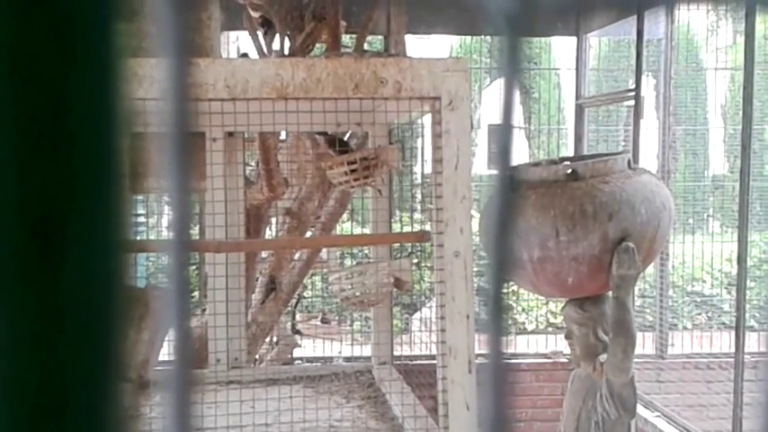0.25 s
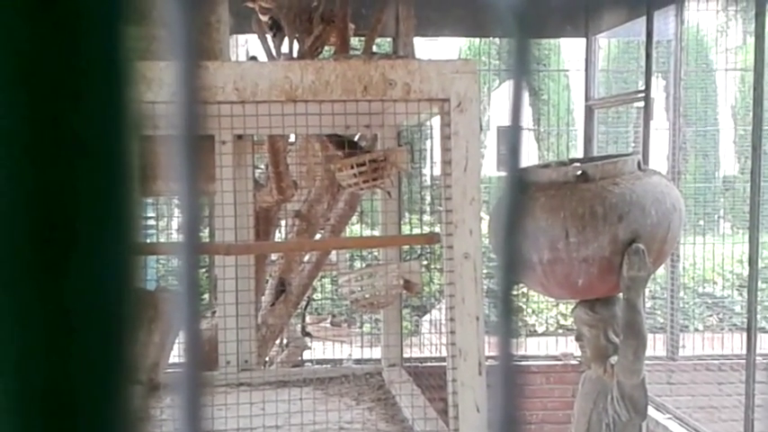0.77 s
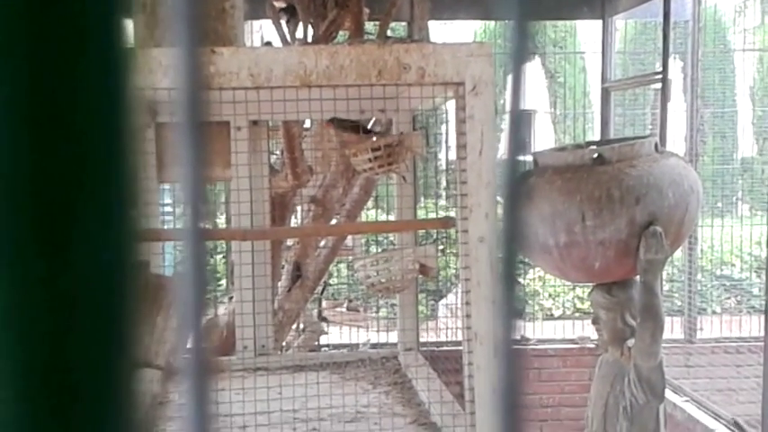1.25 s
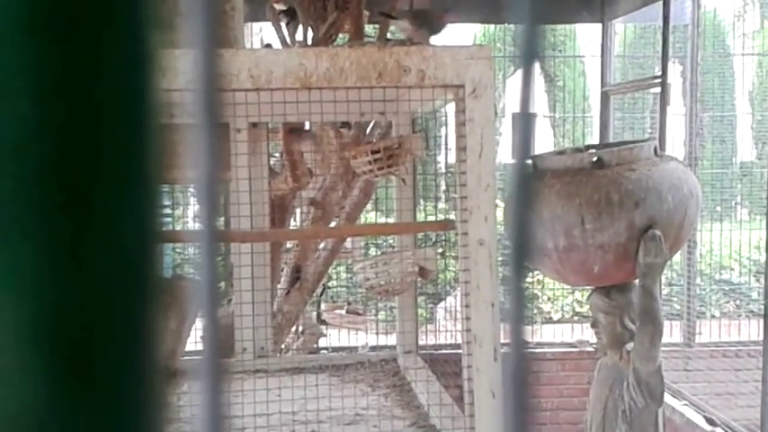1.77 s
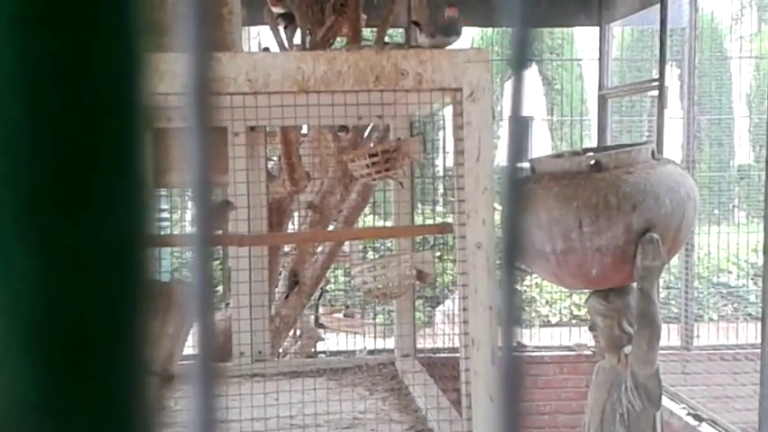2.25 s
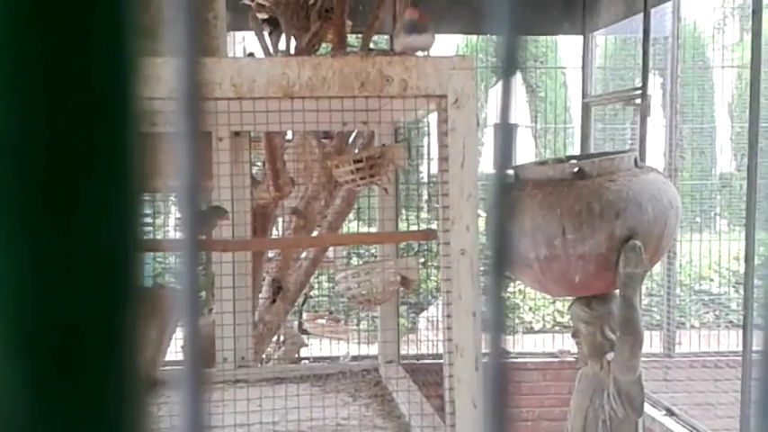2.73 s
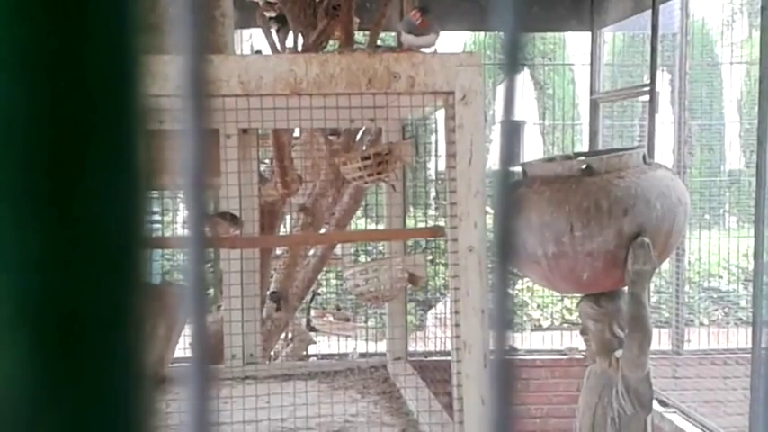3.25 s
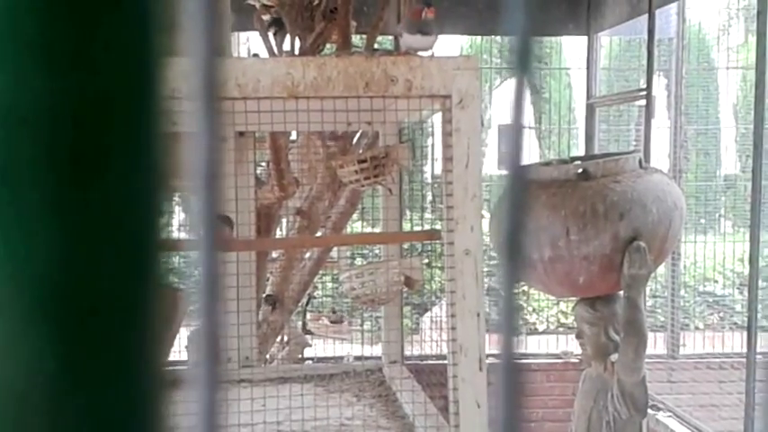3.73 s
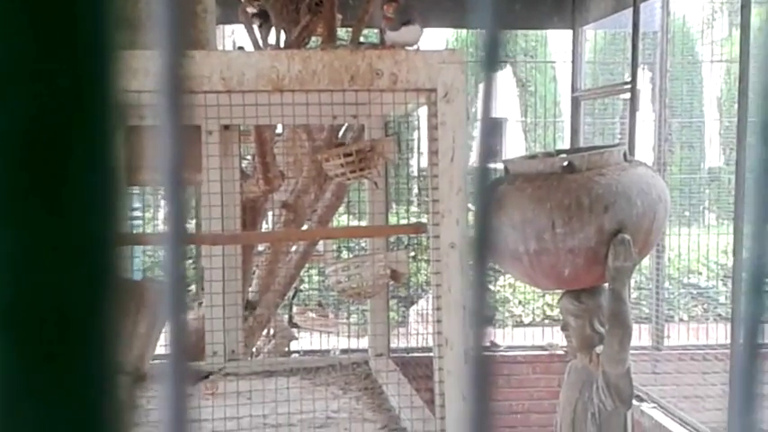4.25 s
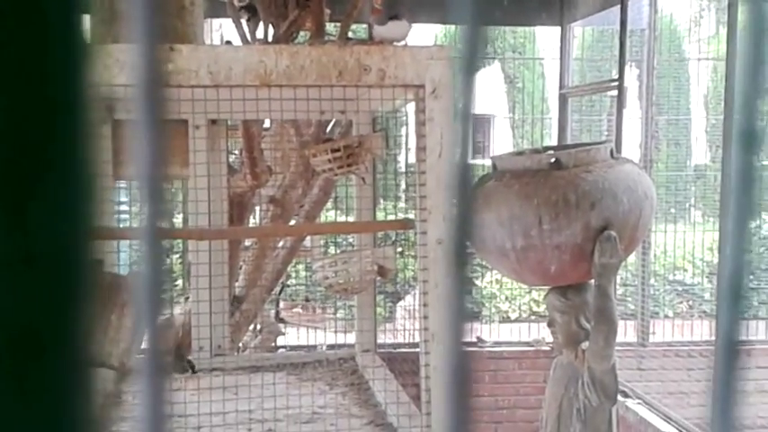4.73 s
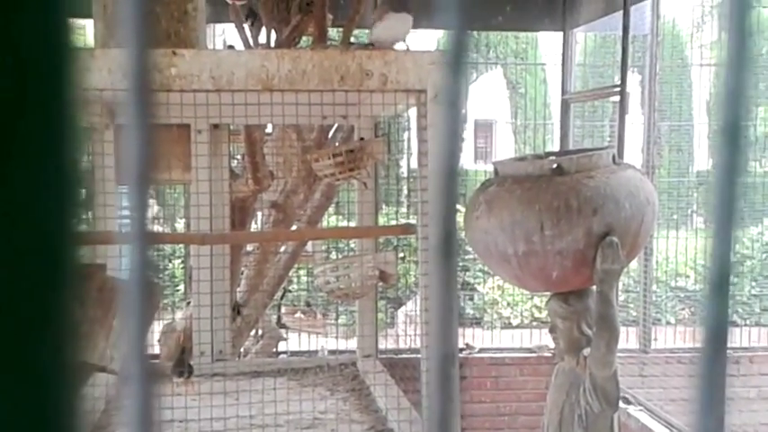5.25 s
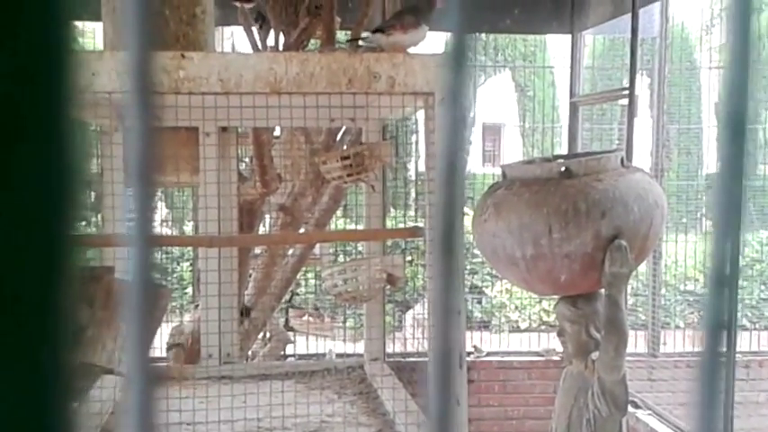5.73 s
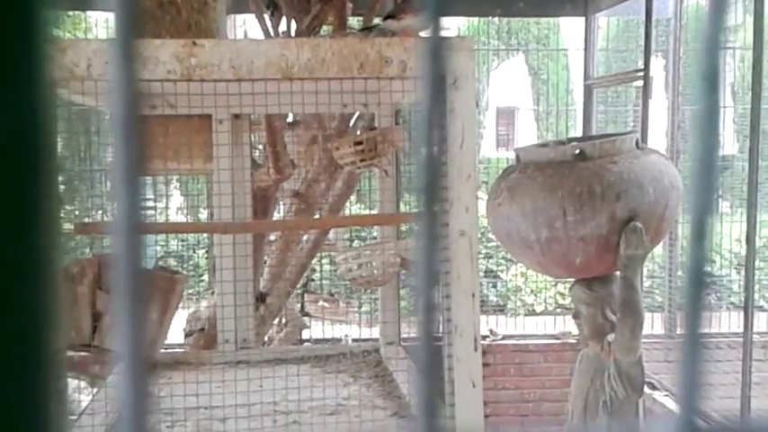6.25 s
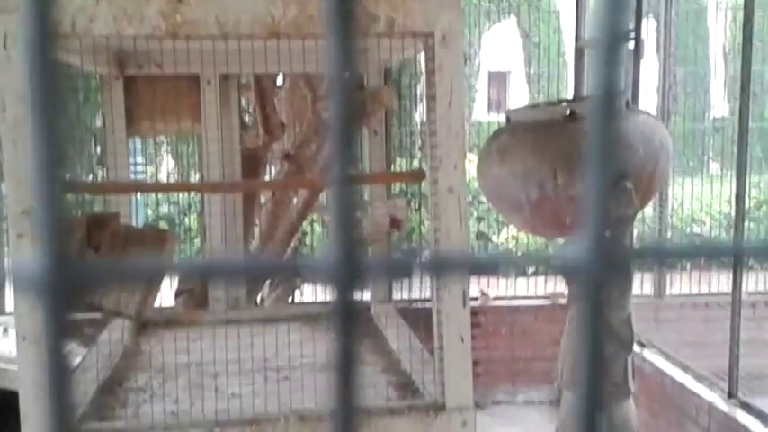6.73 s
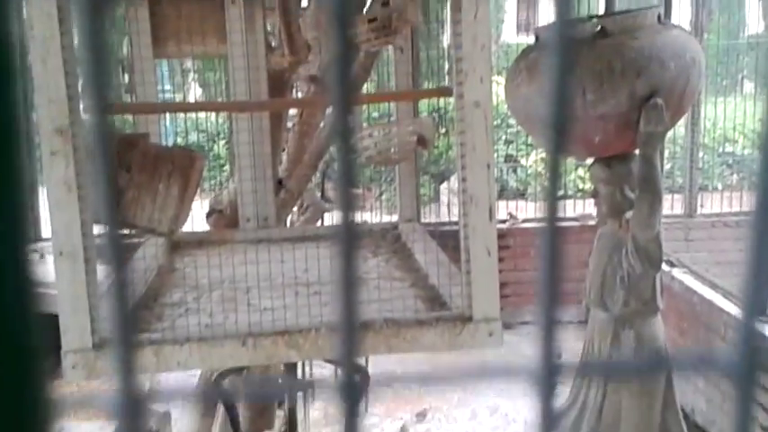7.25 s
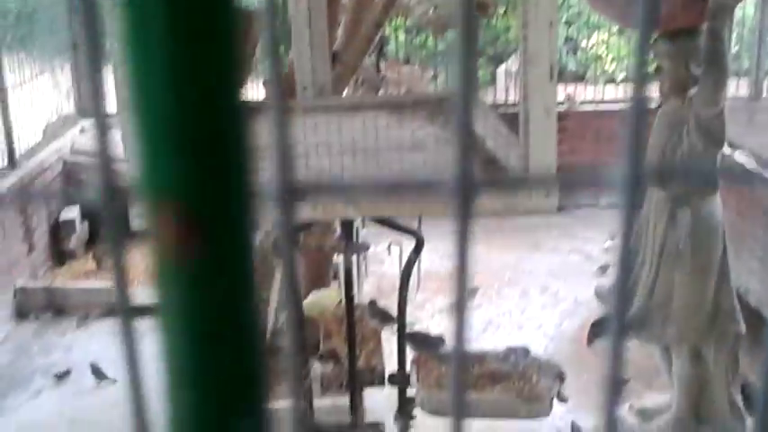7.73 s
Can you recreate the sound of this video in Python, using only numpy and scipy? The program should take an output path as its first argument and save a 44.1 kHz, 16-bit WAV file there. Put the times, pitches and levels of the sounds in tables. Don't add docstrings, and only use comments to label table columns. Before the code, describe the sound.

Bright finch whistles, quick chips and harsh scolds burst over a continuous blurred chorus of distant birds, with wing flutters and dry wire ticks.

```python
import sys
import numpy as np
from scipy import signal
from scipy.io import wavfile
from scipy.ndimage import uniform_filter1d

SR = 44100
rng = np.random.default_rng(int(sys.argv[2]) if len(sys.argv) > 2 else 0)


def output_pcm(signal):
    pcm = np.clip(np.atleast_2d(signal).T, -1, 1) * 32767
    wavfile.write(sys.argv[1], SR, np.round(pcm).astype(np.int16))


def voltage_ratio(decibels):
    exponent = np.asarray(decibels, float) / 20
    return 10 ** exponent


N = 352403


def evened(x):
    return x / np.sqrt(np.mean(x ** 2) + 1e-20)


def read(points, hz):
    f, value = np.transpose(points)
    return np.interp(np.log(hz + 1), np.log(f + 1), value)


def add(mix, start_s, sound):
    part = mix[max(round(start_s * SR), 0):][:len(sound)]
    part += sound[:len(part)]


def wobble(seconds):
    size = max(int(seconds * SR), 2)
    noise = uniform_filter1d(rng.standard_normal(N), size)
    return evened(uniform_filter1d(noise, size))


def hiss(colour, patchy_db, lift_db=0):
    frames, hz = N // 256 + 5, np.fft.rfftfreq(1024, 1 / SR)
    real, imag, patches = rng.standard_normal((frames, 513, 3)).T
    patches = uniform_filter1d(patches, size=8, axis=0)
    patches = evened(uniform_filter1d(patches, size=12, axis=1))
    level_db = read(colour, hz)[:, None] + patchy_db * patches + lift_db
    spectra = (real + 1j * imag) * voltage_ratio(level_db)
    return evened(signal.istft(spectra, nperseg=1024, noverlap=768)[1][:N])


def held(rows, scoop=0.0246, droop=0.023):
    return [(s, length, hz * (1 - scoop), hz, hz * (1 - droop), db) for s, length, hz, db in rows]


def glided(rows, bend=.62):
    return [(s, length, a, a + bend * (b - a), b, db) for s, length, a, b, db in rows]


def sing(rows, jitter_hz, flutter_db, octave_db, fade, attack_s):
    out = np.zeros(N)
    shake = wobble(.0012) + .3 * wobble(.008)
    flutter = wobble(.0016) + .5 * wobble(.008)
    for s, length, start_hz, mid_hz, end_hz, db in rows:
        at = min(max(round(s * SR), 0), N - 2)
        u = np.linspace(0, 1, max(int(length * SR), 8))[:N - at]
        span = slice(at, at + len(u))
        arch_hz = np.polyval(np.polyfit([0, .5, 1], [start_hz, mid_hz, end_hz], 2), u)
        strain = 1 + .25 * (length > .105 and db < -21)
        phase = 2 * np.pi * np.cumsum(arch_hz + strain * jitter_hz * shake[span]) / SR
        effort = voltage_ratio(octave_db + 0.62 * min(db + 10, 0) - 13.4 * u) * (0.46 + shake[span])
        overtone = np.sin(2 * phase) + voltage_ratio(-7) * np.sin(3 * phase)
        tone = np.sqrt(2) * (np.sin(phase) + effort * overtone)
        shape = np.clip(np.minimum(u * length / attack_s, (1 - u) / fade), 0, 1)
        shape = shape * voltage_ratio(np.sqrt(strain) * flutter_db * flutter[span])
        add(out, s, voltage_ratio(db) * shape * tone)
    return out


def aviary(x, longer=1):
    # frequency in Hz, t60 in s.
    decay = [(1000, .35), (3000, .3), (6000, .3), (10000, .22)]
    out, place = np.zeros(N), 2 * np.pi * 3.1 * np.arange(N) / SR
    for k in range(3):
        taps = np.zeros(SR // 2)
        at = np.arange(90, SR // 2 - 20, 20) + rng.integers(0, 20, (SR // 2 - 91) // 20)
        taps[at] = rng.choice([-1., 1.], len(at))
        hz, t, z = signal.stft(taps, SR, nperseg=256)
        t60_s = longer * read(decay, hz)[:, None]
        tail = signal.istft(z * voltage_ratio(-60 * t / t60_s), SR, nperseg=256)[1]
        share = np.sqrt(2 / 3) * np.cos(place + k * np.pi / 3)
        out += signal.oaconvolve(x * share, tail / np.linalg.norm(tail))[:N]
    return out


def traffic():
    # frequency in Hz, level in dB per Hz.
    wash_colour = [(12, -38.5), (20, -13), (27, -17), (96, 6.5), (146, -2.5), (225, -7), (341, -2.5),
                   (555, -9), (630, -6), (841, -9.5), (1500, -7.5), (1950, -15), (3300, -120)]
    # time in s, level in dB.
    rumble = [(0.0, -54.5), (3.71, -53), (4.74, -54.5), (5.83, -50.5), (7.99, -52)]
    # time in s, level in dB.
    hum = [(0.0, -57), (4.87, -50), (5.5, -40), (5.87, -60), (7.99, -50.5)]
    t, hz = np.arange(N) / SR, np.fft.rfftfreq(1024, 1 / SR)[:, None]
    s, level_db = np.transpose(rumble)
    swell_db = np.interp(np.arange(N // 256 + 5) * 256 / SR, s, level_db - level_db.mean())
    wash = hiss(wash_colour, 1.9, swell_db * np.clip((200 - hz) / 80, 0, 1))
    drone = np.sin(2 * np.pi * np.cumsum(145 * (1 + 0.0146 * wobble(0.221))) / SR)
    drone_db = np.interp(t, *np.transpose(hum)) - 7.0
    return voltage_ratio(-47.5) * wash + voltage_ratio(drone_db) * drone


def chorus():
    # time in s, level in dB, low voices against the rest in dB.
    flock = [(0, -29.5, -11.5), (.5, -34.5, -11), (.89, -31, -12), (1.11, -37.5, -11.5), (1.27, -29, -11.5),
             (1.42, -36.5, -14), (2.07, -35, -8.5), (2.4, -29.5, -13), (2.7, -32, -9.5),
             (3.1, -34.5, -12.5), (4.62, -28.5, -10.5), (4.76, -32, -9), (5.96, -28.5, -13.5),
             (6.36, -34.5, -5.5), (6.72, -29, -12), (7.1, -35, -9), (7.36, -27, -15.5), (7.55, -32, -9)]
    # frequency in Hz, level in dB per Hz.
    colour = [(530, -27.5), (900, -16.5), (2330, -8), (2620, -10), (3720, -2), (4990, -3), (5810, -0.5),
              (7010, -12.5), (7610, -18.5), (8070, -25), (9740, -26), (13800, -33.5), (14900, -31)]
    s, level_db, low_db = np.transpose(flock)
    when, long, high, bend, loud = rng.random((650, 5)).T
    hz = 2500 + 4200 * high ** .7
    start_hz, end_hz = hz * (1 - 0.1485 * bend), hz * (1 + 0.083 * bend)
    call_db = read(colour, hz) - 5 * loud
    rows = np.transpose([when * N / SR, 0.0157 + 0.0436 * long, start_hz, hz, end_hz, call_db])
    calls = sing(rows, 77.3, 0.47, -47, 0.43, 0.012)
    calls = evened(voltage_ratio(-20.0) * calls + aviary(calls, 0.8))

    t = np.arange(N // 256 + 5) * 256 / SR - 512 / SR
    hz = np.fft.rfftfreq(1024, 1 / SR)[:, None]
    shrill = np.clip((hz - 2900) / 600, 0, 1)
    swell_db = np.interp(t, s, level_db) - np.mean(level_db)
    lows_db = np.interp(t, s, level_db + low_db) - np.mean(level_db + low_db)
    lift_db = shrill * swell_db + 0.55 * (1 - shrill) * lows_db
    lift_db = lift_db * np.clip((8200 - hz) / 1500, .3, 1)
    shrill_bunches = np.resize(wobble(.03)[::256], len(t))
    low_bunches = np.resize(wobble(.05)[::256], len(t))
    bunches_db = 2.15 * shrill * shrill_bunches + 1.15 * (1 - shrill) * low_bunches
    lift_db = lift_db + bunches_db * (hz < 7500)
    patchy_db = 2.27 * np.where(hz < 7300, 1, .5)
    blur = hiss(colour, patchy_db, lift_db) * voltage_ratio(np.mean(level_db) + 2.0)
    calls_db = np.interp(np.arange(N) / SR, s, level_db) - 4.5
    return voltage_ratio(-2.5) * blur + voltage_ratio(calls_db) * calls


def ticks():
    # start in s, peak level in dB, ring frequency in Hz.
    strikes = [
        (1.1836, -17.5, 7430),
        (4.7426, -19, 6760),
        (2.2542, -34, 5700),
        (2.5155, -31, 5600),
        (2.6105, -28, 4500),
        (2.632, -35, 4500),
        (7.633, -39, 6800),
        (7.9727, -33, 6800),
    ]
    out, t = np.zeros(N), np.arange(300) / SR
    for s, db, hz in strikes:
        ring = np.sin(2 * np.pi * hz * t) * voltage_ratio(-60 * t / .006)
        crack = np.diff(rng.standard_normal(300), prepend=0) * voltage_ratio(-15 - 60 * t / .004)
        add(out, s, voltage_ratio(db + 10.5) * (ring + crack))
    return out


def wings_and_scolds():
    # start in s, length in s, low edge in Hz, level in dB.
    flurries = [(0.182, .13, 3130, -31.5), (0.738, .099, 3020, -36.5), (1.2, 0.13, 2700, -29),
                (1.584, 0.014, 1570, -33.5), (2.556, 0.14, 3020, -36), (3.53, 0.13, 4440, -34),
                (4.437, 0.061, 3500, -28), (5.172, 0.05, 5400, -25), (7.227, 0.14, 1990, -33),
                (7.317, 0.21, 3020, -37)]
    # start in s, length in s, low edge in Hz, level in dB.
    scolds = [(0.811, 0.053, 4270, -28), (1.072, 0.16, 5220, -14), (1.352, 0.095, 4730, -23.5),
              (3.426, 0.085, 4700, -25), (4.215, .088, 3380, -37), (6.65, 0.14, 3200, -35),
              (.823, 0.16, 4730, -28), (7.228, .1, 4700, -25.5), (5.185, .13, 4500, -27),
              (4.835, .07, 5000, -28)]
    out, air = np.zeros(N), rng.standard_normal(N) * voltage_ratio(2.2 * wobble(.003))
    rows = [(*row, 6900, -18.5) for row in flurries]
    rows += [(*row, 6140, -30) for row in scolds]
    for s, length, low_hz, db, high_hz, air_db in rows:
        piece = air[round(s * SR):][:int(length * SR)]
        band = signal.butter(3, [low_hz, high_hz], "band", fs=SR, output="sos")
        body = evened(signal.sosfilt(band, piece))
        u = np.linspace(0, 1, len(piece))
        shape = np.minimum(u / 0.061, 1) * np.cos(u * np.pi / 2) ** 1.65
        add(out, s, voltage_ratio(db) * (body + voltage_ratio(air_db) * piece) * shape)
    return out


def far_peeps():
    # start in s, length in s, pitch in Hz, level in dB.
    peeps = [(.082, 0.059, 4000, -32.5), (.425, .05, 2880, -35), (.166, 0.045, 6800, -34),
             (.75, .06, 4150, -36), (.67, 0.058, 3774, -34.5), (.8, 0.065, 3720, -36),
             (.885, .035, 4020, -32), (.935, 0.018, 4060, -33), (.965, .02, 4050, -34),
             (2.322, .025, 5850, -33), (1.209, 0.075, 3060, -38), (1.615, 0.045, 4190, -36),
             (1.82, 0.094, 3590, -39), (2.136, 0.13, 2870, -36), (2.59, 0.11, 5130, -33.5),
             (2.717, 0.056, 4670, -31.5), (2.48, .095, 4660, -29.5), (2.325, .05, 4780, -31),
             (2.238, .018, 5000, -32), (2.205, .06, 3950, -34), (3.97, .05, 3800, -36),
             (4.25, .03, 5720, -31), (7.515, .02, 5550, -30), (3.57, .035, 4850, -34),
             (2.78, 0.047, 3600, -34), (2.853, 0.042, 5500, -32), (2.942, .031, 4520, -38),
             (3.75, 0.029, 5400, -40), (4.06, 0.055, 2815, -40), (4.745, 0.073, 2800, -35),
             (4.76, .045, 4880, -35), (6.125, 0.092, 5150, -31.5), (4.962, .018, 5680, -27),
             (4.992, .015, 5850, -28), (5.01, .015, 5650, -30), (4.645, 0.016, 5670, -26),
             (6.05, 0.094, 3750, -36), (6.383, 0.051, 4666, -31.5), (6.59, 0.04, 5480, -34),
             (6.84, 0.028, 6120, -33), (6.505, 0.043, 3430, -40), (7.345, 0.028, 3970, -38),
             (7.68, 0.075, 3700, -33.5), (7.835, .06, 3430, -36), (7.415, .025, 3080, -36),
             (.02, .05, 4280, -33), (7.882, 0.14, 5930, -39)]
    return sing(held(peeps), 36, 3, -40, .4, .012)


def nasal_calls():
    # start in s, length in s, fundamental in Hz, level in dB.
    nasals = [(.01, 0.085, 1427, -33), (0.609, 0.074, 958, -30.5), (0.806, 0.1, 1360, -35),
              (2.069, 0.1, 642, -46), (2.303, 0.1, 958, -39), (2.481, 0.1, 1165, -41),
              (2.708, 0.093, 937, -37), (3.374, 0.06, 1014, -32), (3.765, 0.09, 1365, -32),
              (4.716, 0.09, 1390, -31), (5.335, 0.14, 1395, -39.5), (5.75, 0.06, 930, -38),
              (6.578, 0.085, 1400, -32), (6.734, 0.094, 1380, -44)]
    # frequency in Hz, gain in dB.
    throat = [(900, -30), (1400, -15), (1900, -23), (2800, -13), (3900, 3), (5000, -1), (5700, -11),
              (7000, -21)]
    overtones = [(s, length, k * hz, db + read(throat, k * hz))
                 for s, length, hz, db in nasals for k in range(1, 10) if k * hz < 7300]
    return sing(held(overtones, scoop=0.025, droop=0.012), 12, 2, -40, .22, .012)


def grainy_chatter():
    # start in s, length in s, from Hz, to Hz, level in dB.
    chatter = [(.198, .018, 4100, 4300, -26), (.228, .022, 4020, 4140, -28), (.2, 0.063, 4850, 4740, -29.5),
               (.19, 0.044, 3330, 3380, -32), (.675, .03, 5600, 5660, -32), (.67, 0.028, 4500, 4300, -35),
               (.92, 0.051, 5300, 5800, -32), (1.67, .04, 3300, 3480, -34.5), (1.675, .02, 6000, 6050, -35),
               (2.258, 0.028, 4080, 4280, -32), (2.395, 0.056, 5600, 5450, -31),
               (2.53, .05, 5600, 5900, -30), (2.575, 0.075, 3420, 3620, -28),
               (2.6, 0.044, 4150, 4010, -31.5), (3.43, .06, 4600, 4900, -31), (3.5, 0.095, 5900, 5680, -30),
               (3.53, 0.064, 5200, 5300, -31.5), (3.535, .03, 6800, 6850, -37),
               (4.03, 0.08, 4550, 4700, -34.5), (3.9, .07, 4600, 4450, -35), (5.1, .07, 6000, 5700, -33),
               (4.06, .07, 3700, 3450, -36), (4.18, .05, 5500, 5900, -29), (.44, .08, 4200, 3500, -35),
               (5.06, .06, 4900, 4100, -33), (4.78, .05, 3700, 4300, -33), (4.19, 0.065, 4270, 4025, -31),
               (4.215, 0.095, 3800, 3450, -31.5), (4.52, 0.094, 3510, 3720, -33.5),
               (4.63, 0.042, 4900, 4700, -39), (6.39, .04, 3880, 3500, -34),
               (6.645, 0.034, 4610, 3600, -28.5), (6.685, 0.037, 4400, 3590, -29.5),
               (6.735, .05, 4100, 3400, -31), (6.665, .035, 5300, 5770, -33), (6.77, .04, 4030, 4090, -37),
               (6.84, .05, 4690, 4520, -33.5), (7.245, 0.053, 6580, 6900, -35),
               (7.245, .045, 6100, 5900, -29), (7.39, 0.05, 5870, 5680, -37)]
    return sing(glided(chatter), 150, 4.5, -30, .4, .006)


def coos():
    # start in s, length in s, pitch in Hz, level in dB.
    mellow = [(0.41, 0.09, 1620, -47), (1.875, 0.08, 2155, -46), (1.96, 0.1, 2170, -44),
              (2.07, .1, 2250, -46), (3.554, .03, 1710, -42), (2.224, 0.14, 2138, -36.5),
              (2.46, 0.069, 2143, -39.5), (2.55, 0.073, 2012, -38.5), (2.62, 0.12, 2336, -39),
              (2.719, 0.098, 2240, -39), (4.3, 0.13, 1310, -52), (5.68, 0.04, 1600, -41),
              (6.274, 0.24, 2410, -47), (6.2, .1, 1310, -52), (7.04, 0.14, 1315, -49),
              (7.25, .1, 1300, -52), (7.493, 0.1, 1350, -51), (7.63, .1, 1240, -49),
              (7.235, .03, 2200, -41), (7.903, 0.092, 2110, -48.5)]
    return sing(held(mellow), 26, 2.8, -27, .5, .015)


def open_beak_calls():
    # start in s, length in s, from Hz, to Hz, level in dB.
    bright = [(4.432, .025, 5950, 6900, -25.5), (5.183, 0.103, 5130, 5090, -21),
              (7.315, .055, 3800, 4600, -23.5), (1.244, .046, 5050, 5250, -23.5),
              (1.345, 0.059, 5150, 5250, -25), (1.225, .07, 4400, 4550, -29), (1.07, .05, 5000, 5900, -24),
              (1.36, .075, 6650, 6720, -30.5), (1.222, .09, 6390, 7150, -29.5),
              (7.372, .035, 4400, 4500, -24), (7.415, .03, 4500, 4900, -24.5),
              (4.482, .02, 5960, 6650, -17.5)]
    return sing(glided(bright), 80, 2.8, -15, .4, .005)


def slurs():
    # start in s, length in s, from Hz, to Hz, level in dB.
    slides = [(0.91, .027, 4330, 7200, -28), (.815, .012, 4300, 6300, -28), (.825, .04, 4400, 5300, -29),
              (1.39, 0.059, 5400, 5600, -26.5), (.39, .05, 3900, 4280, -35), (.74, .04, 3550, 4300, -36),
              (3.278, .018, 5300, 4400, -32), (3.29, .03, 4700, 4550, -35), (3.37, .06, 4700, 5150, -39),
              (1.04, 0.082, 4840, 6020, -28), (7.275, .045, 3450, 3720, -31),
              (2.194, 0.16, 3730, 4110, -42), (4.172, .035, 7000, 6500, -31),
              (3.283, 0.016, 4800, 3700, -32), (4.177, 0.02, 5350, 5300, -26),
              (4.825, 0.03, 5200, 5900, -29), (5.416, .052, 5750, 5220, -35), (5.2, 0.013, 4650, 4800, -26),
              (5.838, .014, 4650, 4850, -26), (5.85, 0.018, 5100, 4750, -24), (5.76, .045, 5500, 6050, -34),
              (5.76, .045, 4150, 4530, -36), (6.025, .015, 5400, 5000, -34), (5.835, .025, 3700, 3150, -34),
              (5.45, .02, 4200, 4250, -32), (6.62, 0.028, 4500, 5000, -26.5), (6, .05, 3964, 4900, -43),
              (7.105, 0.015, 5650, 5900, -27), (5.695, 0.045, 4800, 5160, -28.5),
              (4.41, 0.027, 4500, 3900, -34.5), (7.428, .022, 4900, 4300, -23),
              (7.703, .018, 4550, 4850, -28), (7.72, 0.018, 4850, 4480, -26), (7.75, .035, 5500, 4700, -34)]
    return sing(glided(slides), 45, 2.2, -27, .3, .006)


def rising_chips():
    # start in s, length in s, top pitch in Hz, level in dB.
    chips = [(0.546, 0.027, 6450, -27.5), (1.067, 0.018, 6400, -24), (1.246, .036, 6900, -25),
             (1.368, 0.028, 6600, -28.5), (1.932, 0.016, 6730, -35), (2.244, 0.02, 6490, -30.5),
             (3.08, .031, 6350, -29.5), (3.741, 0.032, 6440, -26), (4.123, 0.024, 6200, -27.5),
             (4.839, 0.029, 6780, -24), (5.637, .033, 6640, -23.5), (6.056, 0.026, 6000, -27.5),
             (6.499, 0.026, 6600, -23), (6.908, 0.024, 6300, -24), (7.367, 0.025, 6380, -24)]
    rows = [(s, length, 4850, top_hz, db) for s, length, top_hz, db in chips]
    calls = sing(glided(rows, bend=.5), 70, 2.5, -42, .2, .005)
    return calls + voltage_ratio(-5.5) * aviary(calls, 0.32)


def near_whistles():
    # start in s, length in s, pitch in Hz, level in dB.
    whistles = [(.078, 0.078, 5080, -30), (.083, .018, 5760, -25.5), (.11, .04, 6050, -32),
                (.175, .02, 5270, -25), (.153, 0.038, 6040, -19), (.22, .034, 6240, -27.5),
                (.822, 0.16, 6498, -15.5), (1.105, 0.08, 6450, -21), (1.095, 0.11, 6050, -14),
                (1.104, 0.081, 5680, -16.5), (1.213, 0.044, 5800, -22), (2.512, 0.02, 5700, -27.5),
                (3.063, 0.052, 5000, -30.5), (3.437, 0.022, 5950, -17.5), (3.427, 0.017, 5550, -20),
                (3.478, 0.024, 5920, -21), (4.165, .014, 6300, -25), (4.184, 0.06, 6180, -20.5),
                (4.464, 0.026, 6350, -15.5), (4.497, 0.075, 6230, -17.5), (4.86, 0.03, 5700, -27),
                (5.04, 0.035, 5140, -25), (5.24, 0.047, 4990, -33), (5.96, 0.022, 4100, -29),
                (6.052, 0.073, 5460, -31), (6.225, 0.018, 4210, -27.5), (6.44, 0.014, 5640, -28),
                (7.01, 0.018, 4330, -28.5), (7.25, 0.055, 5620, -27), (6.44, .018, 6400, -31),
                (7.24, 0.033, 4300, -24)]
    return sing(held(whistles, scoop=0.0046, droop=0.0048), 75, 2.8, -27, .5, .005)


def scene():
    wire, harsh = ticks(), wings_and_scolds()
    far = far_peeps() + nasal_calls() + grainy_chatter()
    quick = rising_chips() + slurs()
    near = near_whistles() + coos() + open_beak_calls()
    to_walls = voltage_ratio(-3.0) * near + voltage_ratio(-4.5) * far + voltage_ratio(-1.5) * quick + voltage_ratio(-3.0) * harsh + voltage_ratio(-20) * wire
    direct = voltage_ratio(-1.0) * near + voltage_ratio(-3.0) * far + voltage_ratio(2.5) * quick + harsh + wire
    return (direct + aviary(to_walls) + chorus() + traffic())[None]


def top_cut(x):
    return signal.sosfilt(signal.butter(12, 15010, fs=SR, output="sos"), x)


def record(dry):
    power_db = 10 * np.log10(abs(uniform_filter1d(dry[0] ** 2, size=1500)) + 1e-12)
    fall_db = np.arange(N) * 23.0 / SR
    held_db = np.maximum.accumulate(power_db + fall_db) - fall_db
    over_db = np.maximum(held_db + 14.5, 0)
    mix = dry[0] / voltage_ratio(uniform_filter1d(over_db, size=300))
    mix = signal.sosfilt(signal.butter(2, 45, "high", fs=SR, output="sos"), mix)
    mix = mix / (1 + (mix / .7) ** 4) ** .25
    return top_cut(mix[None])


dry = scene()
out = record(dry)
output_pcm(out)
```